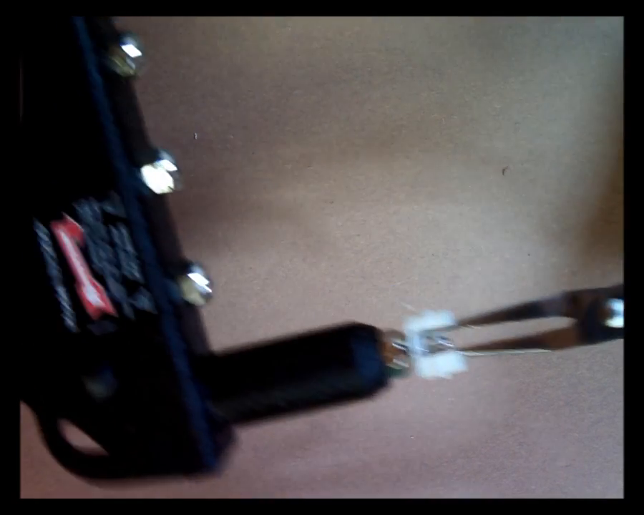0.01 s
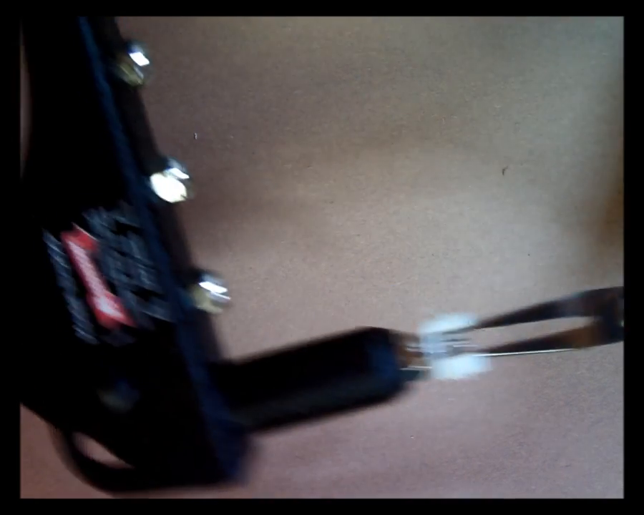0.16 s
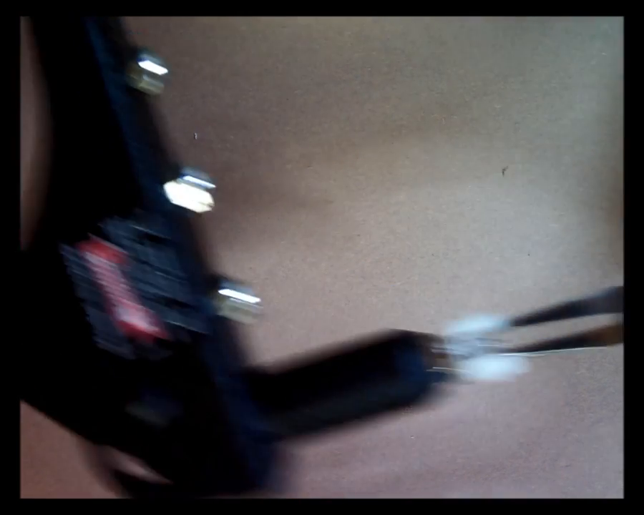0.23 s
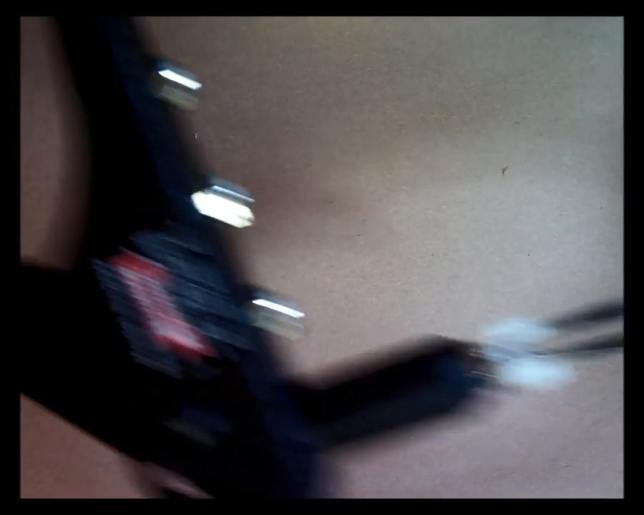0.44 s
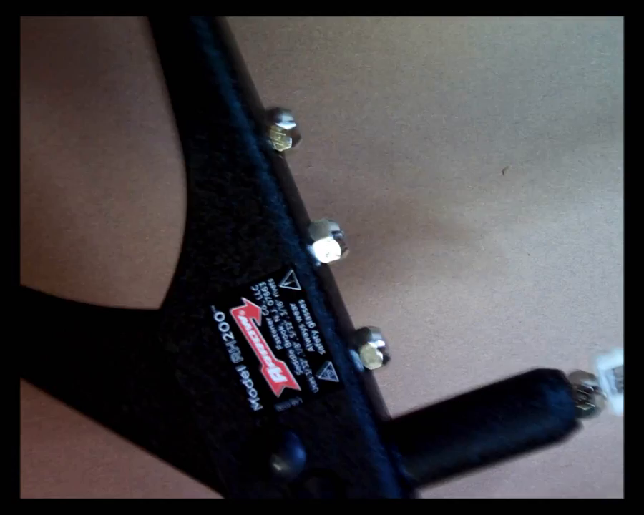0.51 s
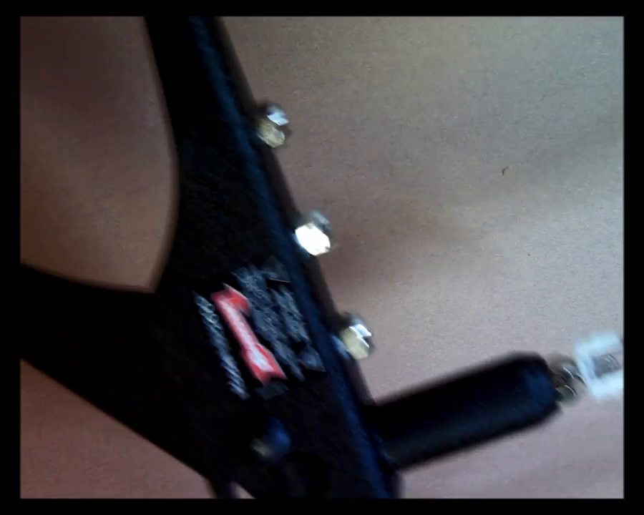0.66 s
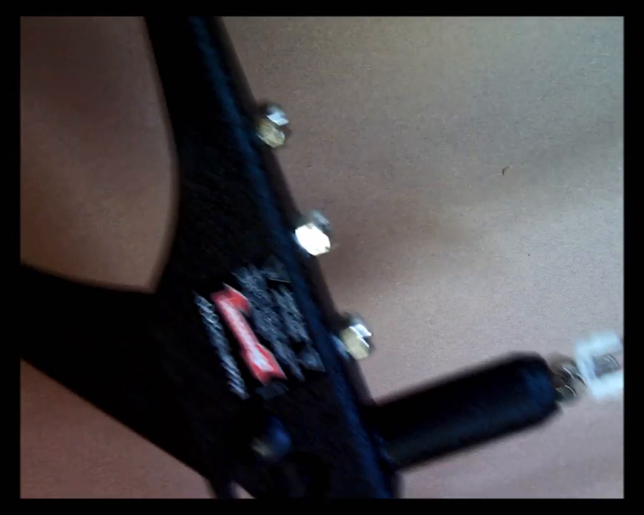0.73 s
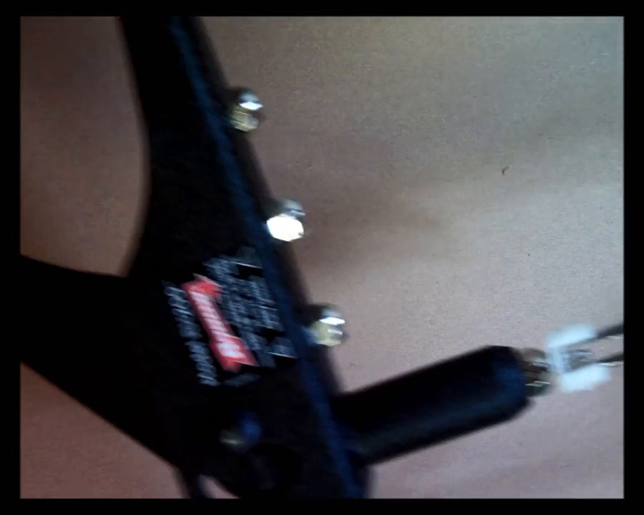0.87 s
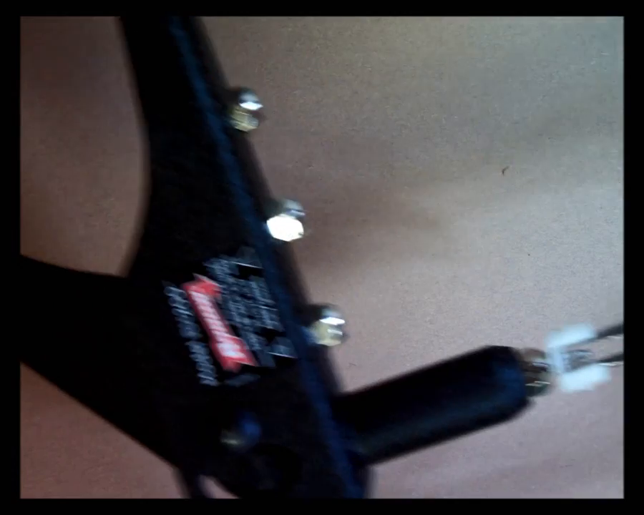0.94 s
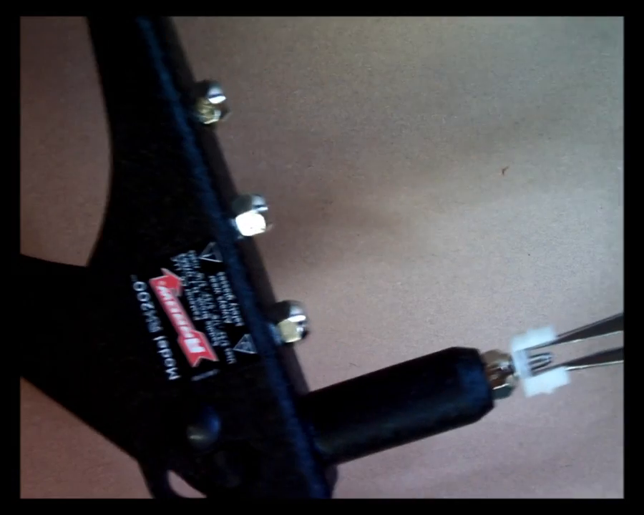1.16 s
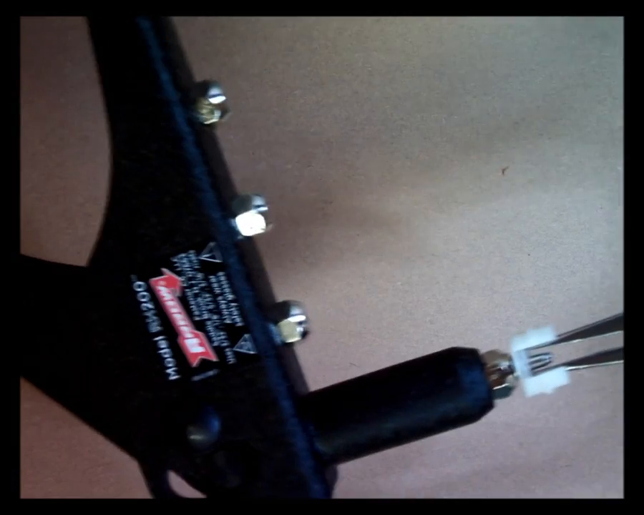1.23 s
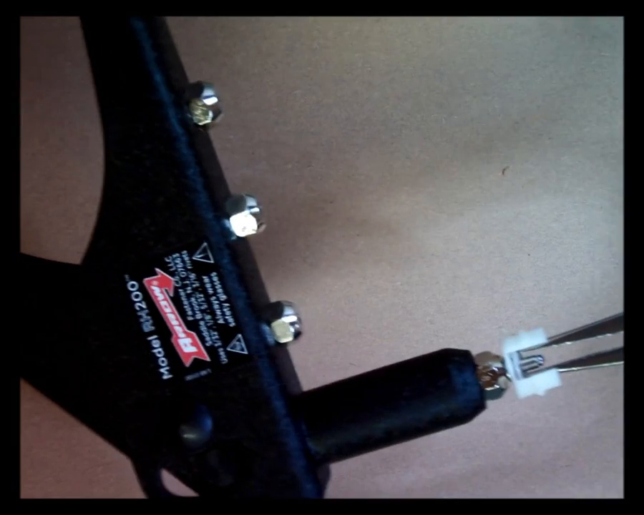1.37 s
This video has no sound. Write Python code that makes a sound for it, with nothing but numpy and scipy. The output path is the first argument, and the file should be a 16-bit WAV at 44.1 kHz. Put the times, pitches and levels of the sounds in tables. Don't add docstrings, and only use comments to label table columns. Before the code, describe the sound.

A hand riveter close to the microphone: a faint gritty metal scrape, a loud sharp snap with brief room reverberation, two tiny ticks, then a softer handle click, over low mains hum and faint hiss.

```python
import sys
import numpy as np
from scipy import signal
from scipy.fft import rfft, irfft
from scipy.io import wavfile
from scipy.ndimage import uniform_filter1d

SR = 44100
rng = np.random.default_rng(int(sys.argv[2]) if len(sys.argv) > 2 else 0)


def persist_wave(psi):
    counts = np.round(np.clip(psi, -1, 1) * 32767).astype(np.int16)
    wavfile.write(sys.argv[1], SR, np.atleast_2d(counts).T)


def gain_from_db(level_db):
    decades = np.asarray(level_db, float) / 20
    return 10 ** decades


N = 61739


def level(x, db):
    return x * gain_from_db(db) / np.sqrt(np.mean(x ** 2))


def colour(x, shape):
    hz, db = np.array(shape).T
    log_hz = np.log(np.maximum(np.fft.rfftfreq(N, 1 / SR), 1))
    below = np.maximum(np.log(hz[0]) - log_hz, 0)
    above = np.maximum(log_hz - np.log(hz[-1]), 0)
    gain_db = np.interp(log_hz, np.log(hz), db) - 30 * (below + above)
    return irfft(rfft(x) * gain_from_db(gain_db), N)


def walk(rate_hz):
    span = int(SR / rate_hz)
    drift = uniform_filter1d(rng.standard_normal(N), span)
    drift = uniform_filter1d(drift, span)
    return drift / drift.std()


def ring(favoured_hz):
    # pitch in Hz, level in dB, time to fall by 60 dB in ms.
    tool_modes = [(300, -30, 11), (895, -12, 11), (1657, -6, 7), (1905, 0.5, 10.1), (2500, -5, 7.4),
                  (3400, -3.5, 6.2), (4600, -5, 9.6), (5580, -9, 6.96), (6745, 1, 5.34), (7440, -10.5, 6.8),
                  (8170, -1.5, 6.3), (10090, -10.5, 10), (10800, -9, 5), (11850, -11, 5)]
    favour_db = 5
    t = np.arange(2000) / SR
    total = np.zeros(len(t))
    for k, (hz, db, t60_ms) in enumerate(tool_modes):
        strength = gain_from_db(db - favour_db * np.log2(hz / favoured_hz) ** 2)
        fade = np.exp(-np.log(1000) * t / t60_ms * 1000)
        total += (-1) ** k * strength * np.sin(2 * np.pi * hz * t) * fade
    return total


def riveter():
    # start in seconds, level in dB, favoured pitch in Hz, chatter length in ms.
    contacts = [(0.2443, -43, 6000, 0.46), (0.2456, -18, 6500, 1.2), (0.247, -19.5, 3700, 0.67),
                (0.2475, -20, 2500, 1.04), (.2490, -23, 5030, 0.99), (0.2547, -31.5, 6500, 1.7),
                (.4168, -45.5, 5800, 1.2), (.4180, -41, 2620, 1), (0.4201, -51, 4000, 1.1),
                (0.4265, -53, 3620, .6), (0.4492, -54, 5000, 0.84), (0.4497, -56.5, 1600, 1.1),
                (.4520, -43.5, 2300, 1.5), (1.1066, -52.5, 6000, 0.77), (1.1077, -36, 5830, 1.3),
                (1.1088, -35, 2620, 0.73), (1.1167, -43, 3800, 1)]
    chatter_per_s, chatter_db = 4810, 5
    out, blows = np.zeros(N), np.zeros(N)
    t_ms = np.arange(256) / SR * 1000
    for start_s, db, hz, chatter_ms in contacts:
        chance = rng.random(len(t_ms))
        strength = gain_from_db(chatter_db * rng.standard_normal(len(t_ms)))
        sign = rng.choice([-1, 1], len(t_ms))
        happens = np.clip((chatter_per_s / SR - chance) * 20 + 0.5, 0, 1)
        hits = happens * sign * strength * np.exp(-(t_ms / chatter_ms) ** 2)
        hits[0] = np.abs(hits).max() + 0.5
        sound = np.convolve(hits, ring(hz))
        sound = sound * gain_from_db(db) / np.sqrt(np.mean(sound[:100] ** 2))
        i = int(start_s * SR)
        out[i:i + len(sound)] += sound
        blows[i] = np.sqrt(np.sum(sound ** 2))
    return out, blows


def slide():
    # frequency in Hz, strength in dB per Hz.
    scrape_tone = [(240, -55), (400, -24), (668, -14), (852, -12), (968, -6.5), (1090, -9), (2590, -4),
                   (6270, -7), (12100, -21.5), (15700, -48.5), (22000, -120)]
    start_s, rise_s, hold_s = 0.097, 0.011, 0.048
    fade_db_per_s, grit_db = 126.5, 0.5
    t = np.arange(N) / SR - start_s
    rough = rng.standard_normal(N) * gain_from_db(grit_db * walk(300))
    scrape = level(colour(rough, scrape_tone), -46.5)
    fade = gain_from_db(-fade_db_per_s * np.maximum(t - hold_s, 0))
    return scrape * np.clip(t / rise_s, 0, 1) * fade


def room(blows):
    # centre in Hz, level in dB, time to fall by 60 dB in seconds.
    room_bands = [(770, -4, .35), (1960, 3, 0.44), (2840, -1, 0.53), (4200, 1.5, .42), (6500, -2.5, 0.4),
                  (9000, -16, .32), (11500, -10, 0.33)]
    room_db, gap_s, build_s = -10, 0.0034, 0.003
    spread = 1.25
    t = np.arange(N) / SR - gap_s
    tail = np.zeros(N)
    for hz, db, t60_s in room_bands:
        sos = signal.butter(2, [hz / spread, hz * spread], "bandpass", fs=SR, output="sos")
        band = signal.sosfilt(sos, rng.standard_normal(N))
        tail += band * gain_from_db(db) * np.exp(-np.log(1000) * t / t60_s)
    tail = tail * np.clip(t / build_s, 0, 1)
    tail = tail * gain_from_db(room_db) / np.sqrt(np.sum(tail ** 2))
    return signal.fftconvolve(blows, tail)[:N]


def hum():
    mains_hz, crest_s, wobble_db, second_db = 60.0, 0.407, 0.7, -25
    phase = 2 * np.pi * mains_hz * (np.arange(N) / SR - crest_s)
    first = np.cos(phase) * gain_from_db(wobble_db * walk(9.3))
    second = gain_from_db(second_db) * np.cos(2 * phase)
    return level(first + second, -47.5)


def air():
    # frequency in Hz, strength in dB per Hz.
    rumble_tone = [(22, -3), (144, -3), (446, -7.5), (750, -12), (1000, -13), (1500, -18), (2000, -39)]
    hiss_tone = [(880, -28.5), (1500, -4.5), (2420, -7.5), (2890, -1.5), (3850, -2.5), (4710, -9.5),
                 (9300, -22.5), (11300, -21.5), (12100, -23.5), (15700, -55), (22000, -120)]
    # time in seconds, level in dB.
    rumble_course = [(0.0, -63), (0.096, -63.5), (0.24, -65.5), (0.868, -61.5), (1.246, -63), (1.4, -62)]
    rumble_db, swell_db, hiss_db = 3.5, 1.5, -61.5
    rumble = level(colour(rng.standard_normal(N), rumble_tone), rumble_db)
    course_db = np.interp(np.arange(N) / SR, *np.array(rumble_course).T)
    rumble = rumble * gain_from_db(course_db + swell_db * walk(4.6))
    hiss = level(colour(rng.standard_normal(N), hiss_tone), hiss_db)
    return rumble + hiss


def scene():
    tool, blows = riveter()
    return (tool + room(blows) + slide() + hum() + air())[None]


def top_cut(x):
    return signal.sosfilt(signal.butter(12, 12230, fs=SR, output="sos"), x)


def record(dry):
    top_hz, offset = 11870, 0.0003
    sos = signal.ellip(10, 0.3, 60, top_hz, fs=SR, output="sos")
    mix = signal.sosfilt(sos, dry) + offset
    return top_cut(mix)


dry = scene()
out = record(dry)
persist_wave(out)
```